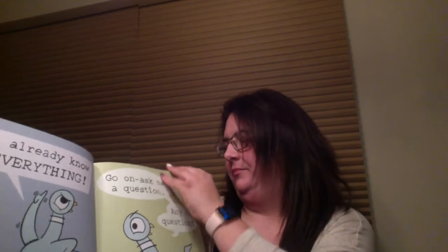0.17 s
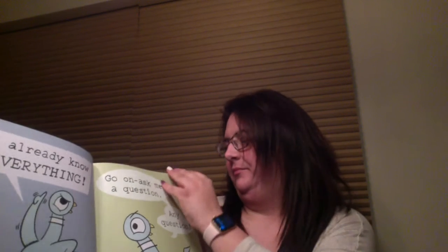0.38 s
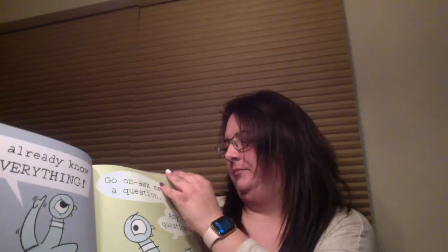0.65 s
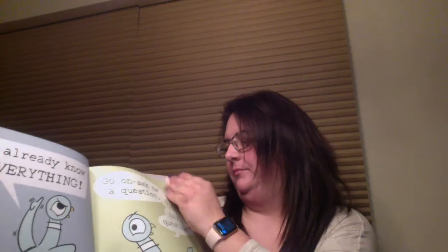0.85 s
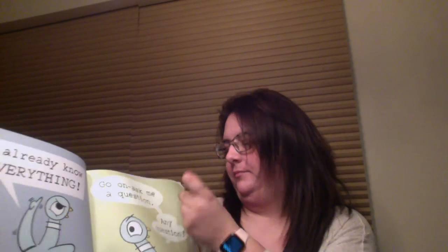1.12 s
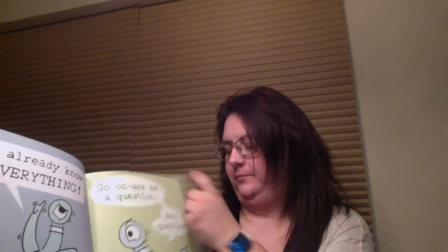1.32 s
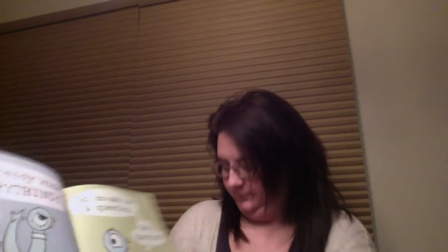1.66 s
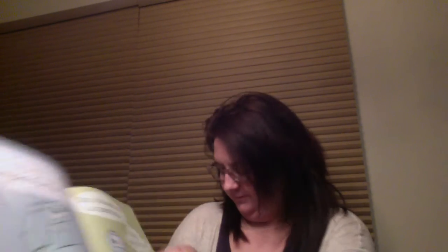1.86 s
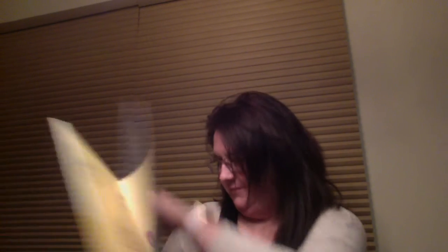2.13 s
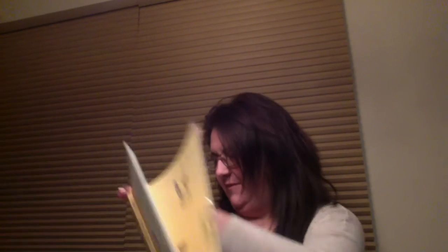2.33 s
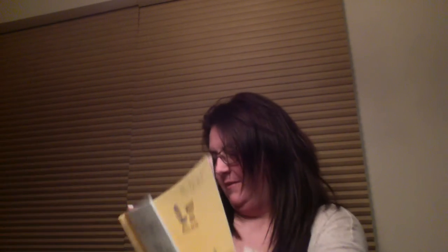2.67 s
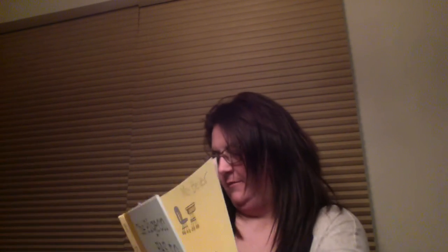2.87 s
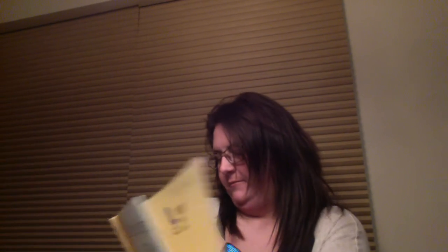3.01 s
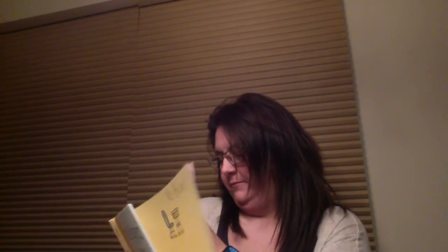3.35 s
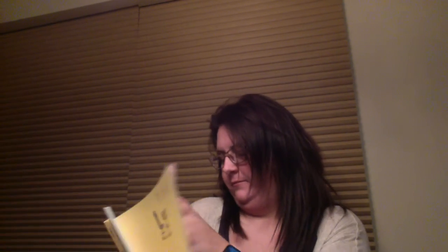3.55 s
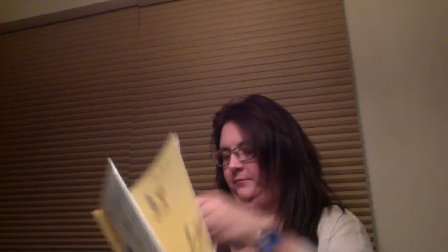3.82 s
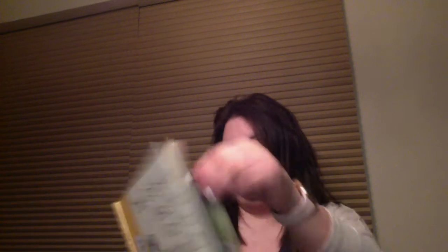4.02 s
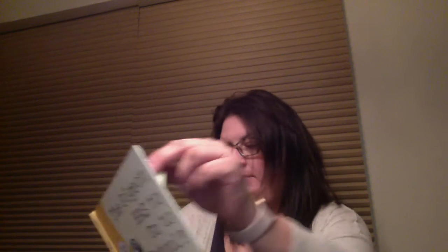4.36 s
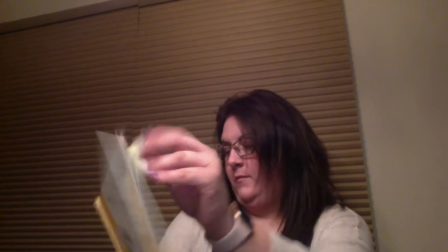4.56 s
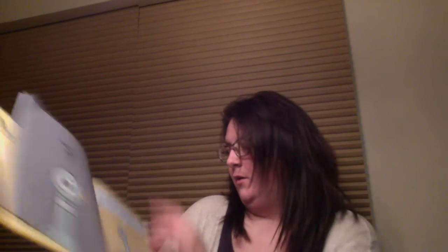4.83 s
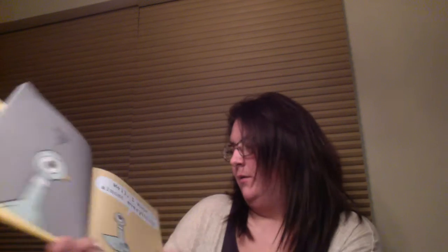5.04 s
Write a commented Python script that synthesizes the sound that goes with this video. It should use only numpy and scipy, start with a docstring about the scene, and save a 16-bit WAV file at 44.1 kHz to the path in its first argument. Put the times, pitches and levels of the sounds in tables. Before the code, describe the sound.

A small, quiet room with soft moving air and a faint, steady fan tone; a hardcover picture book is handled close to a small microphone. For the first 0.7 seconds there are only very faint paper slides and a tiny tick. At 0.8 a crisp snap with a small pop starts the handling, followed by brushing hiss and a cluster of dry snaps and hollow pops around 1.35 to 1.5. It eases to soft rubbing until a sharp flick at 2.4 and a short scrape near 2.7. A strong flap lands at 3.0, another at 3.4, then the loudest, thumping pair at 3.8 and 3.9 amid rushing paper slides. Crackling smaller flaps follow at 4.15 to 4.25, with lighter ones at 4.6 and 4.75. A last faint pop comes near 5.15. Short room reflections trail each hit, and the air settles.

```python
"""A small quiet room, a small microphone, a hardcover picture book near enough to outweigh the room's tail.
Filtered noise makes soft air and a faint fan throughout; faint slides of gated, grainy noise come first.
From 0.8 s flaps (shaped noise bursts) and hollow pops (decaying mode pairs) cluster, then ease to rubbing.
Strong flaps come at 3 to 4 s, smaller ones until 4.8 s, then one last faint pop; reflections follow each."""
import sys
import numpy as np
from scipy import signal
from scipy.fft import rfft, irfft, next_fast_len
from scipy.io import wavfile
from scipy.ndimage import uniform_filter1d

SR = 44100
rng = np.random.default_rng(int(sys.argv[2]) if len(sys.argv) > 2 else 0)


def waveform_to_disk(signal):
    """Save audio, clipped to [-1, 1], as 16-bit WAV at the path in sys.argv[1]."""
    frames = np.transpose(np.atleast_2d(signal))
    scaled = np.clip(frames, -1, 1) * 32767
    samples = np.round(scaled).astype(np.int16)
    wavfile.write(sys.argv[1], SR, samples)


N = 228702  # samples, about 5.2 s


def from_db(db):
    """Turn decibels into an amplitude factor."""
    return 10 ** (np.asarray(db) / 20)


def rms_one(x):
    """Scale to an rms of 1."""
    return x / np.sqrt(np.mean(x ** 2) + 1e-20)


def at_hz(points, hz):
    """Read a spectrum along a log-frequency axis."""
    knots, values = np.transpose(points)
    return np.interp(np.log(np.maximum(hz, 1)), np.log(knots), values)


def add(out, s, sound):
    """Mix a short sound in at its time in seconds."""
    start = max(round(s * SR), 0)
    out[start:start + len(sound)] += sound[:max(N - start, 0)]


def coloured(x, points):
    """Give a steady signal a spectrum; rms 1."""
    size = next_fast_len(N, True)
    gain = from_db(at_hz(points, np.fft.rfftfreq(size, 1 / SR)))
    return rms_one(irfft(rfft(x, size) * gain, size)[:N])


def causal_filter(x, gain):
    """Minimum-phase filter with these gains: nothing sounds before its cause."""
    cepstrum = irfft(np.log(gain + 1e-9))
    # fold the second half onto the first
    cepstrum[1:len(x) // 2] *= 2
    cepstrum[len(x) // 2 + 1:] = 0
    return irfft(rfft(x) * np.exp(rfft(cepstrum)))


def smooth_chance(shape, size, axis=-1):
    """Random values that change gently along one axis; spread 1."""
    once = uniform_filter1d(rng.standard_normal(shape), size, axis)
    return rms_one(uniform_filter1d(once, size, axis))


def grains(count, spread_db):
    """Fibres slip in countless tiny steps of very uneven size."""
    step_sizes = from_db(spread_db * rng.standard_normal(count))
    return rms_one(rng.standard_normal(count) * step_sizes)


def swell_and_die(swell_ms, decay_ms, size):
    """Stress builds up in the sheet, then lets go: a power-law rise and an exponential fall to 1/e."""
    ms = np.arange(size) / SR * 1000
    swell = np.minimum(ms / swell_ms, 1) ** 1.5
    return swell * np.exp(-np.maximum(ms - swell_ms, 0) / decay_ms)


# The room's air, as a relative spectrum. Each row: frequency in Hz, level in dB per Hz.
AIR_SPECTRUM = [(30, -41), (78, -32), (120, -3), (200, -4.5), (320, 1.5), (480, -6), (720, -3.5),
                (1400, -7.5), (2100, -10), (4000, -20), (6300, -29.5), (10000, -35), (13000, -41.5),
                (16000, -39)]
# Narrow fan tones. Each row: centre in Hz, offset in Hz where the tone is 12 dB down, rms level in dB.
FAN_TONES = [(287, 4.9, -69), (316, 4.8, -86.5), (587.4, 23, -72.5), (1420, 5.3, -74)]
AIR_DB, HANDLING_DB = -63, 4  # air rms, and how much louder it is while the book is moved
HANDLING_START_S, HANDLING_END_S = 0.76, 5.3
HANDLING_RISE_S, HANDLING_FALL_S = 0.35, 0.94


def background():
    """Soft moving air as coloured noise, with the narrow, unsteady tones of a fan as narrow-band noise."""
    full_s, easing_s = HANDLING_START_S + HANDLING_RISE_S, HANDLING_END_S - HANDLING_FALL_S
    turns_s = [HANDLING_START_S, full_s, easing_s, HANDLING_END_S]
    handling = np.interp(np.arange(N) / SR, turns_s, [0, 1, 1, 0])
    mix = coloured(rng.standard_normal(N), AIR_SPECTRUM) * from_db(AIR_DB + HANDLING_DB * handling)
    for centre, width, db in FAN_TONES:
        line = [(centre - 3 * width, -70), (centre - width, -12), (centre, 0),
                (centre + width, -12), (centre + 3 * width, -70)]
        mix += from_db(db) * coloured(rng.standard_normal(N), line)
    return mix


# Surfaces near the book. Each row: nominal delay after the direct sound in ms, level in dB.
NEAR_ECHOES = [(6.6, -15.5), (8.6, -19.5)]
# How long the room rings. Each row: frequency in Hz, time to fall by 60 dB in seconds,
# with the extra early strength of the tail left out.
RING_TIMES = [(150, 0.54), (600, 0.35), (1800, 0.36), (4500, 0.39), (7000, 0.33), (12000, 0.12)]


def room_response(tail_db=-5.0, build_s=0.0049, early_db=5.0, early_s=0.019, size=16384, order=21):
    """Direct sound, two close reflections, then a diffuse tail that dies soonest in the high treble."""
    t, hz = np.arange(size) / SR, np.fft.rfftfreq(size, 1 / SR)
    white, tail = rfft(rng.standard_normal(size)), np.zeros(size)
    arrival = (1 - np.exp(-t / build_s)) * from_db(early_db * np.exp(-t / early_s))
    edges = np.r_[0, np.geomspace(250, 16000, 17)]  # Hz
    for low, high in zip(edges, edges[1:]):
        band = irfft(white * (hz >= low) * (hz < high), size)
        t60 = at_hz(RING_TIMES, (low + high) / 2)
        tail += band * arrival * np.exp(-np.log(1000) * t / t60)
    # the many overlapping reflections have an even spectrum and about unit energy
    power = uniform_filter1d(np.abs(rfft(tail)) ** 2, 3 * order)
    response = from_db(tail_db) * causal_filter(tail, 1 / np.sqrt(power + 1))
    response[0] += 1  # direct sound
    for ms, db in NEAR_ECHOES:
        varied_ms = ms * rng.uniform(.85, 1.15)
        response[round(varied_ms * SR / 1000)] += from_db(db)
    return response


def room(x, count=17):
    """The book keeps moving, so each stretch of its sound meets the walls by other paths."""
    out, hop = np.zeros(N), N // count + 1
    for start in range(0, N, hop):
        add(out, start / SR, signal.fftconvolve(x[start:start + hop], room_response()))
    return out


def flexing(x, size=256):
    """The resonances of a moving sheet come and go in patches about 500 Hz wide and 40 ms long."""
    frames = signal.stft(x, nperseg=size)[2]
    patches = rms_one(uniform_filter1d(smooth_chance(frames.shape, size=11), size=3, axis=0))
    return signal.istft(frames * from_db(2.4 * patches))[1][:N]


# Slides of paper or fingers. Each row: time of top speed in seconds, speeding up in seconds,
# slowing down in seconds, level of the hiss in dB before its own trim, brightness in dB.
SLIDE_MOVES = [(0.245, 0.08, 0.076, -71, -27), (0.572, 0.033, 0.018, -72.5, -6),
               (0.93, 0.055, 0.11, -56, 0.5), (1.03, 0.038, 0.091, -58, -1.5),
               (1.228, 0.15, 0.095, -56.5, -4), (1.535, 0.016, 0.06, -70, -1),
               (1.598, 0.04, 0.055, -60, -16.5), (2.009, 0.096, 0.19, -60, 6),
               (2.184, 0.02, 0.12, -60.5, -6), (2.622, 0.11, 0.087, -58, -10),
               (2.727, 0.044, 0.019, -47, -8), (2.93, 0.15, 0.092, -58, -0.5),
               (3.275, 0.047, 0.066, -59, -5.5), (3.41, 0.061, 0.017, -56, -2.5),
               (3.551, 0.02, 0.11, -59, 4.5), (3.667, 0.043, 0.034, -47.5, 0.5),
               (3.725, 0.054, 0.16, -46.5, 0), (3.814, 0.028, 0.011, -47.5, 10.5),
               (3.99, 0.2, 0.073, -46.5, -6), (4.075, 0.027, 0.022, -51.5, -4),
               (4.135, 0.045, 0.03, -56, -19), (4.335, 0.038, 0.033, -61, -12.5),
               (4.58, 0.088, 0.047, -59.5, 4)]
# Relative spectra of a slide's low, middle and top parts. Each row: frequency in Hz, level in dB per Hz.
RUB_SPECTRUM = [(150, -28), (500, -11.5), (1400, -8), (2300, -10.5), (3500, -47), (8000, -81)]
HISS_SPECTRUM = [(1200, -22.5), (2500, -3), (3600, 4.5), (6500, -6), (9000, -24), (16000, -52)]
FIZZ_SPECTRUM = [(3500, -54), (6500, -3), (9500, 1), (12500, -4), (15500, -19)]
RUB_DB, HISS_DB, FIZZ_DB = -6, -2.5, -3  # trims of the three parts
RUB_LOSS = 0.45  # dB of rub lost for each dB of brightness
SPEED_POWER = 2  # amplitude against sliding speed


def slides(catch_db=2.0):
    """Paper drags over paper, speeding up and slowing down: dense grains, stronger wherever the sheet catches."""
    t, out = np.arange(N) / SR, np.zeros(N)
    slips = grains(N, spread_db=4.5)
    catches = from_db(catch_db * smooth_chance(N, size=300))
    slips = flexing(slips * catches)
    rub = from_db(RUB_DB) * coloured(slips, RUB_SPECTRUM)
    hiss = from_db(HISS_DB) * coloured(slips, HISS_SPECTRUM)
    fizz = from_db(FIZZ_DB) * coloured(slips, FIZZ_SPECTRUM)
    for s, rise_s, fall_s, level_db, bright_db in SLIDE_MOVES:
        ramp = np.interp(t, [s - rise_s, s, s + fall_s], [0, 1, 0])
        speed = np.sin(np.pi / 2 * ramp)
        friction = from_db(-RUB_LOSS * bright_db) * rub + hiss + from_db(bright_db) * fizz
        out += from_db(level_db) * speed ** SPEED_POWER * friction
    return out


# Bowed sheets that buckle and ring. Each row: start in seconds, level of the lower mode in dB,
# mean pitch of the lower mode in Hz, overtone in dB relative to it, decay to 1/e in ms.
BUCKLES = [(0.793, -22.5, 1771, -20, 0.91), (0.793, -40.5, 875, 5, 4.1), (1.3448, -22, 1940, -22, 1.8),
           (1.3465, -30, 2720, -17, 0.81), (1.377, -31, 716, 1, 10.2), (1.395, -27.5, 805, -1, 2),
           (1.468, -37.5, 845, -17, 2.7), (1.578, -42.5, 863, -25, 4.6), (1.644, -37.5, 844, -21, 1.5),
           (2.398, -39.5, 1560, -8, 2.5), (2.724, -37, 1562, -7, 10.6), (3.3897, -24.5, 1862, -12, 1.6),
           (3.4, -27.5, 1093, -2, 2.4), (3.767, -40, 757, -23, 4), (3.823, -22.5, 670, -23, 1.8),
           (3.9005, -16, 1303, -18, 1.5), (3.906, -21, 1480, -31.5, 7.3), (4.147, -23, 730, -12, 2.3),
           (4.168, -32.5, 688, -0.5, 5.5), (4.592, -32, 798, -6, 2), (4.601, -32.5, 901, -2.5, 4.1),
           (4.738, -35, 878, -11, 7), (5.145, -48.5, 835, -12, 2.6)]
POP_SWELL_MS = 3.5


def pops(overtone_ratio=1.75, size=4096):
    """A buckling sheet swells into two bending modes, whose pitch wavers as its curve changes."""
    out = np.zeros(N)
    for s, peak_db, hz, overtone_db, decay_ms in BUCKLES:
        bend = 1 + .14 * smooth_chance((2, size), size=26)  # one pitch waver for each mode
        phase = 2 * np.pi * hz * np.cumsum(bend, axis=1) / SR
        modes = np.sin(phase[0]) + from_db(overtone_db) * np.sin(overtone_ratio * phase[1])
        add(out, s, from_db(peak_db) * swell_and_die(POP_SWELL_MS, decay_ms, size) * modes)
    # the pops carry no deep bass
    return signal.sosfilt(signal.butter(2, 300, "high", fs=SR, output="sos"), out)


# Paper flaps and snaps. Each row: start in seconds, body in dB before the common trim,
# crack in dB relative to the body, edge in dB relative to the body, swell in ms, decay to 1/e in ms.
PAGE_FLAPS = [(0.43, -35, 0, -1.5, 0.43, 1.2), (0.794, -6, 0, -6.5, 1.6, 0.7),
              (0.962, -16.5, -0.5, 3.5, 5.1, 1.1), (1.343, -12, -2, -2.5, 5.5, 0.6),
              (1.386, -6, -14, -48, 1.3, 0.67), (1.449, -7.5, -15, -36, 0.65, 0.87),
              (1.457, -10, -18, -16, 3.1, 1.1), (2.3988, -4, -0.5, -2.5, 1.35, 1.2),
              (2.703, -15.5, -8, -9.5, 3.3, 6), (2.998, 15, -3, -17, 0.8, 5.8),
              (3.3872, 3.5, -20, -35, 3.6, 4), (3.766, -21, -32, -26, 1.3, 0.62),
              (3.8205, 16.5, -14, -36, 6, 7.8), (3.901, 22, -13.5, -23.5, 1.86, 2.65),
              (4.143, 1.5, -4, -9, 4.8, 2.3), (4.153, -0.5, -1.5, -5.5, 1.1, 4.3),
              (4.194, -1.5, 5.5, -8.5, 1.4, 3.1), (4.261, -13, -2, -14, 1.2, 2.7),
              (4.591, -5, -18, -20, 7.2, 3.2), (4.615, -16, 6.5, 13, 4.7, 3.4),
              (4.73, -9.5, 4, -16.5, 7.2, 0.96)]
# Broad, slight colouring shared by all flaps. Each row: centre in Hz, half-width in Hz,
# gain in dB (negative is a dip, 0 no change).
SHEET_COLOURING = [(1620, 330, -1), (3340, 300, 0), (4870, 360, 1)]
THUMP_DB, THUMP_PER_DB = -8.5, 0.4017  # harder flaps move more of the page block
# the sheet lands again: later, weaker, duller, longer (decay times this factor)
SETTLE_S, SETTLE_DB, SETTLE_DULL_DB, SETTLE_STRETCH = 0.007, -6, -1, 2.44
FLAP_TRIM_DB = -5.5


def flaps(size=8192, order=41):
    """A hit and its settling, two crackle bursts: the page block thumps, the sheet cracks, its edge fizzes."""
    out, hz = np.zeros(N), np.fft.rfftfreq(size, 1 / SR)
    sheet_db = sum(db * np.exp(-((hz - centre) / width) ** 2) for centre, width, db in SHEET_COLOURING)
    landings = np.array(PAGE_FLAPS)
    shift = [SETTLE_S, SETTLE_DB, SETTLE_DULL_DB, SETTLE_DULL_DB, 0, 0]
    settlings = (landings + shift) * [1, 1, 1, 1, 1, SETTLE_STRETCH]
    for s, body_db, crack_db, edge_db, swell_ms, decay_ms in np.vstack([landings, settlings]):
        thump_db = THUMP_DB + THUMP_PER_DB * max(body_db, 0)
        burst = grains(size, spread_db=2.0) * swell_and_die(swell_ms, decay_ms, size)
        power = uniform_filter1d(np.abs(rfft(burst)) ** 2, order)  # the crackles together are broadband
        colour = [(40, thump_db - 17), (90, thump_db - 21), (170, thump_db + 1), (380, thump_db),
                  (800, -1.5), (1550, 3.3), (2600, 0.83 * crack_db), (4300, crack_db),
                  (7000, edge_db + 0.5), (11000, edge_db - 6.5), (16000, edge_db - 20.5)]
        # every bend of the sheet has treble resonances of its own
        bend_db = 2.5 * smooth_chance(len(hz), size=110) * np.minimum(hz / 4000, 1)
        gain = from_db(body_db + at_hz(colour, hz) + sheet_db + bend_db)
        add(out, s, causal_filter(burst, gain / np.sqrt(power)))
    return from_db(FLAP_TRIM_DB) * out


def scene():
    """The book sounds in its room, over air and fan."""
    book = flaps() + pops() + slides()
    return (room(book) + background())[None]


CUTOFF_HZ = 15900


def record(dry):
    """A small microphone loses the deep bass; the top is cut."""
    thin = signal.sosfilt(signal.butter(2, 55, "high", fs=SR, output="sos"), dry)
    return signal.sosfilt(signal.ellip(10, .1, 80, CUTOFF_HZ, fs=SR, output="sos"), thin)


dry = scene()
out = record(dry)
waveform_to_disk(out)
```